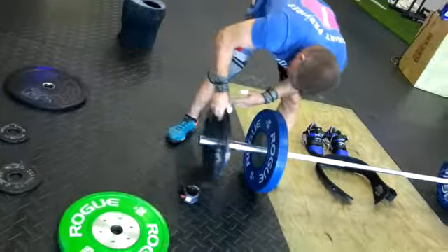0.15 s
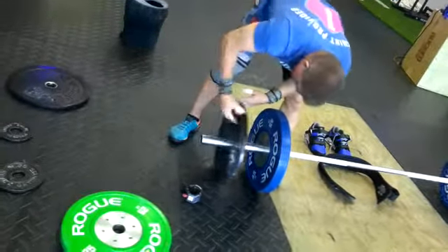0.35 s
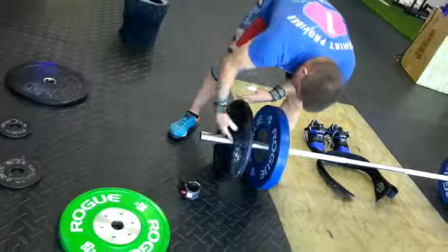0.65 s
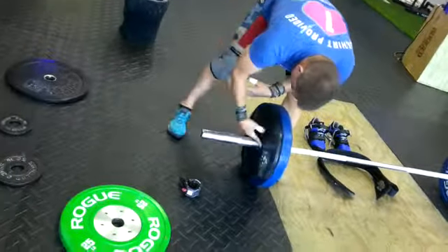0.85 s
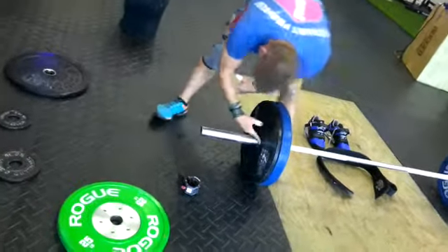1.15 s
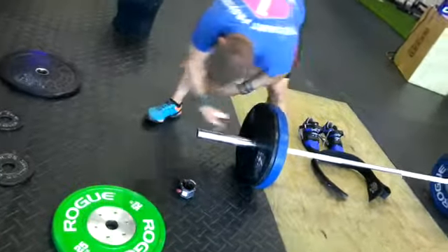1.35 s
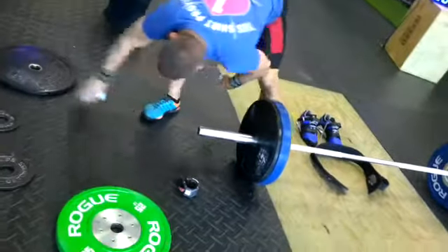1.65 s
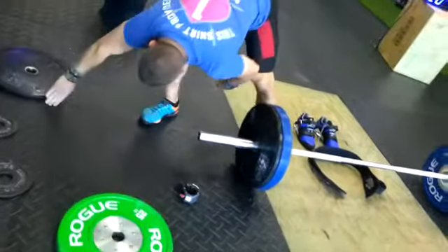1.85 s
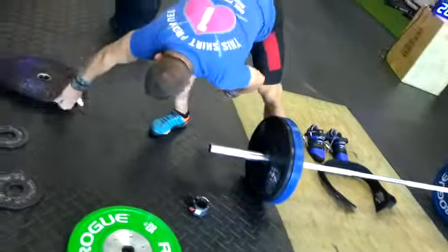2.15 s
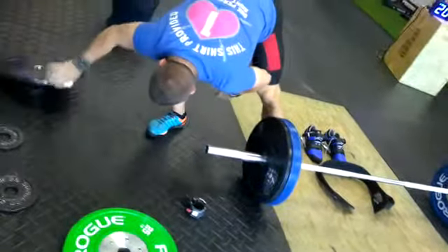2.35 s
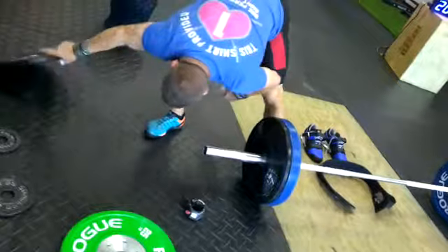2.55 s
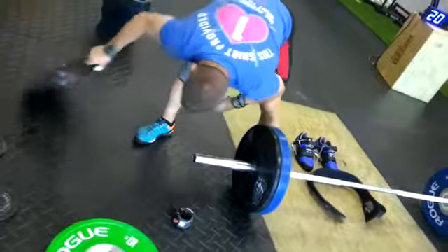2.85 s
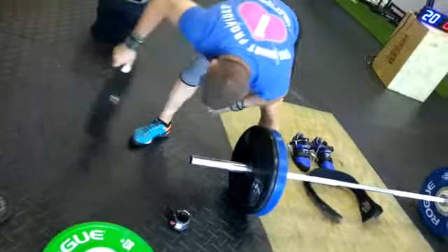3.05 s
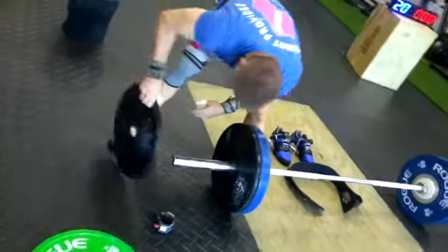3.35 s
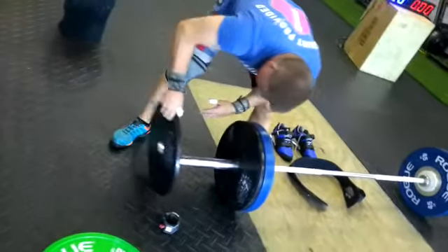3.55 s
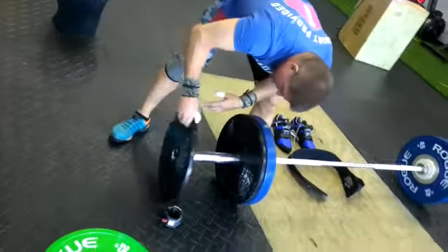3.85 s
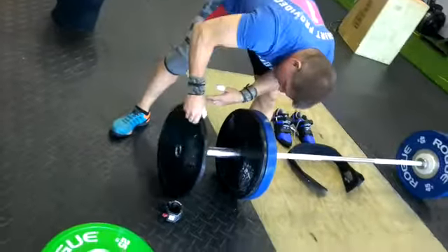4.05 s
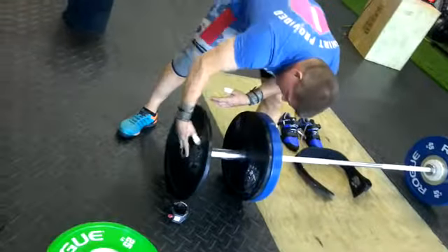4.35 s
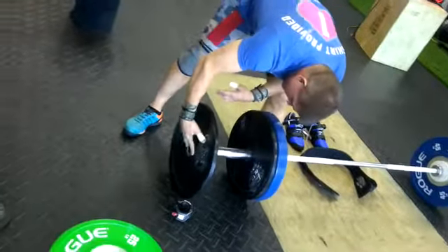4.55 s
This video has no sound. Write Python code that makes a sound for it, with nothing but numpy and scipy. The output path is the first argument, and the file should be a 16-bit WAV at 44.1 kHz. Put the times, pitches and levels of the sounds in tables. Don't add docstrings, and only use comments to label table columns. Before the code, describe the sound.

A rubber weight plate rattles onto a steel bar, squeals along and slams loudly against another plate, then a second plate is dragged and knocked on.

```python
import sys
import numpy as np
from scipy import signal
from scipy.io import wavfile
from scipy.ndimage import uniform_filter1d

SR = 44100
rng = np.random.default_rng(int(sys.argv[2]) if len(sys.argv) > 2 else 0)


def put_to_file(sound):
    columns = np.atleast_2d(sound).T
    safe = np.clip(columns, -1, 1)
    whole_steps = np.round(safe * 32767)
    wavfile.write(sys.argv[1], SR, whole_steps.astype(np.int16))


def gain_from_db(level_db):
    decades = np.asarray(level_db, float) / 20
    return 10 ** decades


N = 207415


def evened(x):
    return x / np.sqrt(np.mean(x ** 2) + 1e-20)


def read(points, hz):
    f, value = np.transpose(points)
    return np.interp(np.log(hz + 1), np.log(f + 1), value)


def add(mix, s, sound):
    part = mix[round(s * SR):][:len(sound)]
    part += sound[:len(part)]


def played(rows):
    s, *columns = np.transpose(rows)
    t = np.arange(s[0], s[-1], 1 / SR)
    return s[0], [np.interp(t, s, c) for c in columns]


def drift(count, span):
    once = uniform_filter1d(rng.standard_normal(count), int(span))
    return evened(uniform_filter1d(once, int(span)))


def resonate(x, hz, width_hz):
    turn = np.exp(2j * np.pi * np.cumsum(hz * np.ones(len(x))) / SR)
    r = np.exp(-np.pi * width_hz / SR)
    return 2 * (turn * signal.lfilter([1 - r], [1, -r], x / turn)).real


def ring(modes, uneven_db, rise_s, detune=0):
    t = np.arange(SR // 6) / SR
    hz, db, t60 = np.transpose(modes)[:, :, None]
    db = db + uneven_db * rng.standard_normal(db.shape)
    hz = hz * (1 + detune * rng.standard_normal(db.shape))
    decaying = gain_from_db(db - 60 * t / t60) * np.sin(2 * np.pi * hz * t)
    sound = decaying.sum(0) * (1 - np.exp(-t / rise_s))
    return sound / abs(sound).max()


def tick(t60, low_hz, top_hz):
    t = np.arange(2000) / SR
    band = signal.butter(2, [low_hz, top_hz], "bandpass", fs=SR)
    return signal.lfilter(*band, gain_from_db(-60 * t / t60) * rng.standard_normal(len(t)) / 2)


def gritty(count, spread_db):
    slips = evened(uniform_filter1d(rng.standard_normal(count), size=90))
    return evened(rng.standard_normal(count) * gain_from_db(spread_db * slips))


# [f/Hz, level/dB, t60/s]
SLAM_BLOWS = [
    (0.8548, 1, [(1053, 1.5, 0.029), (1371, -0.5, 0.031), (1532, -3.5, 0.023), (2046, -7.5, 0.031), (895, 1, 0.024)]),
    (0.8642, -6, [(1384, 1, 0.088), (1610, -2.5, 0.048), (2300, -7, 0.021), (2999, -7.5, 0.04), (1040, -3.5, 0.04)]),
    (0.8694, 11, [(323.4, 2, 0.068), (558, 5, .044), (630.4, 0.5, 0.051), (126.3, -17.5, 0.067), (50, -12, 0.069), (836.5, -9, .04), (1491, -6.5, 0.058)]),
]


def slam():
    out = np.zeros(N)
    for s, db, modes in SLAM_BLOWS:
        add(out, s, gain_from_db(db) * ring(modes, uneven_db=0, rise_s=0.0019))
        add(out, s, gain_from_db(db - 6) * tick(.025, low_hz=300, top_hz=3000))
        add(out, s + .0015, gain_from_db(db - 13) * tick(.014, low_hz=1800, top_hz=7500))
    return out


# steel ring/dB, sharpness/dB, hub crack/dB
KNOCKS = [(.005, -37, -8, 2, -4), (.021, -43, -5, -12, 2), (.032, -41, -5, 7, -2), (.039, -44, 1, -4, -3),
          (.055, -50, 1, 5, 2), (.079, -40, 2, 4, 2), (.090, -39.5, 3, 2.5, -6), (.159, -50, -5, 0, -6),
          (.187, -48, -2, -5, 10), (.197, -42, -8, 4, 8), (0.288, -58, 2, -2, 1), (.391, -50, -5, -7, -10),
          (3.682, -32, -12, -3, -6.5), (3.693, -30, -5, 0, 6), (3.895, -35, -18, 5, -0.5),
          (3.907, -31, -14, 2, -3), (3.928, -30, -22, 12, -5.5), (3.933, -26, -13, 6, -2.5),
          (3.954, -35.5, -9, 10, -0.5), (3.965, -32, -11, 2, -10), (4.156, -61.5, -4.5, 12, 0)]
# f/Hz, level/dB, t60/s
STEEL_LOW = [(3030, -3, .03), (3110, -2, .045), (2750, -8, .015), (3350, -12, .012), (5450, -7, .025),
             (5650, -9, .03)]
STEEL_HIGH = [(7270, -6, .025), (7600, -2, .035), (7800, -1, .03), (8030, -1, .04), (8270, -2, .03),
              (8700, -9, .015), (9300, -8, .02), (10780, -9, .022), (11900, -11, .02), (13390, -14, .03)]
HUB = [(1171, 3, 0.011), (1420, 3, 0.013), (1790, -2, .008), (2300, -2, .008)]
RUBBER = [(190.8, -4, 0.0621), (240, -2.5, 0.067), (279.1, -4, 0.082), (321, 1, 0.14), (380, -6, 0.026),
          (457, -5.5, 0.046), (650, -3, 0.055)]


def knocks():
    out = np.zeros(N)
    for touch_s, db, steel_db, sharp_db, crack_db in KNOCKS:
        s = touch_s + .001
        high_db = steel_db + sharp_db
        for modes, share_db in (STEEL_LOW, steel_db), (STEEL_HIGH, high_db), (HUB, crack_db):
            add(out, s, gain_from_db(db + share_db) * ring(modes, uneven_db=2.2, rise_s=0.0008, detune=0.0081))
        add(out, s, gain_from_db(db + high_db - 1.5) * tick(.02, low_hz=6000, top_hz=11960))
        add(out, s, gain_from_db(db + crack_db + 0.5) * tick(.025, low_hz=700, top_hz=3604))
        add(out, s, gain_from_db(db) * ring(RUBBER, uneven_db=3.5, rise_s=0.0015, detune=0.03955))
    return signal.lfilter(*signal.butter(2, 140, "highpass", fs=SR), out)


# t/s, length/s, start f/Hz, speed-up share per second/(1/s)
RIDGES = [(.315, .06, 950, 1.6), (.155, .024, 9135, .36), (.152, .028, 3600, .5), (.748, .044, 1830, 3),
          (.794, .018, 2560, 2.6), (.808, .056, 2890, 3.6), (.825, .016, 9450, .5)]
# level/dB, overtones against it/dB
SQUEALS = [(-56, -19), (-45, -60), (-59, -30), (-35, -29), (-44, -21), (-39.5, 3), (-34, -60)]


def squeal():
    out = np.zeros(N)
    attack, release, edge_db = .3, .25, 18
    for (top_db, over_db), (s, length, start_hz, speedup) in zip(SQUEALS, RIDGES):
        t = np.arange(0, length, 1 / SR)
        hz = start_hz * (1 + speedup * t)
        db = top_db - edge_db * np.interp(t / length, [0, attack, 1 - release, 1], [1, 0, 0, 1])
        wobble = evened(uniform_filter1d(rng.standard_normal((4, len(hz))), size=150, axis=1))
        turn = 2 * np.pi * np.cumsum(hz * (1 + 0.005 * wobble[0])) / SR
        over = 0
        for k, overtone_db in enumerate([-2, -15, -20], start=2):
            over = over + gain_from_db(overtone_db + 6.8 * wobble[k - 1]) * np.sin(k * turn)
        tone = np.sin(turn) + gain_from_db(over_db) * over
        add(out, s, gain_from_db(db + 4.5) * tone * signal.windows.tukey(len(hz), .1))
    return out


# t/s, hiss level/dB
RUBS = [
    [(0, -58), (.07, -60), (.085, -50.5), (.2, -54), (.28, -61), (.4, -60), (.48, -74)],
    [(.68, -75), (.74, -53), (.785, -44), (.81, -35), (.84, -32), (.858, -35)],
    [(3.928, -51), (3.95, -49), (3.99, -63), (4.12, -78)],
]
# hub body level/dB, disc hum level/dB
GRIP = [(1, 1.5), (1.5, -18), (1.5, -4)]
# f/Hz, width/Hz, level/dB
RUB_BANDS = [(3100, 500, -8), (5750, 400, -5), (6495, 1014, -1), (7646, 1000, 1), (9320, 870, 0),
             (10940, 1400, -1.5), (13000, 1600, -11), (4300, 2200, -2), (8790, 3000, 1.5)]


def slide():
    out = np.zeros(N)
    medium_db, lag_share = -55, .35
    for rows, (grip_db, hum_db) in zip(RUBS, GRIP):
        s, (db,) = played(rows)
        body_db = grip_db + lag_share * (medium_db - db)
        grit = gritty(len(db), spread_db=1.5)
        hiss = 0
        for hz, width_hz, gain_db in RUB_BANDS:
            place = hz * (1 + .025 * drift(len(db), span=900))
            band = resonate(resonate(grit, place, width_hz), place, width_hz) / np.sqrt(width_hz)
            hiss = hiss + gain_from_db(gain_db + 3.0 * drift(len(db), span=237)) * band
        body = evened(resonate(resonate(grit, 1100, 1100), 1400, 1100))
        hum = evened(resonate(resonate(grit, 314, 60), 314, 90))
        rub = evened(hiss) + gain_from_db(body_db) * body + gain_from_db(hum_db) * hum
        add(out, s, gain_from_db(db) * rub * signal.windows.tukey(len(db), .04))
    return out


# t/s, blow level/dB, f/Hz
BUMPS = [(1.441, -50, 140), (1.53, -47, 144), (1.635, -45, 145), (1.988, -51.5, 546), (2.14, -49.5, 140),
         (2.741, -51, 555), (2.805, -47, 600), (2.842, -47.5, 650), (2.866, -43.5, 600), (2.887, -44, 750),
         (2.933, -37, 600), (2.95, -32, 540), (2.967, -47, 600), (2.986, -31, 590), (3.022, -53, 545),
         (3.161, -42.5, 900), (3.178, -59, 1600), (3.629, -49, 109.3), (3.91, -36, 315),
         (3.936, -29.5, 321), (4.142, -54, 321), (4.395, -47, 308), (4.41, -48, 300), (4.611, -58.5, 380)]
# f/Hz, tick level/dB
TICK = [(320, -44), (550, -26), (900, 8), (1600, -8)]


def bumps():
    out = np.zeros(N)
    for s, db, hz in BUMPS:
        t60 = 18 / hz
        modes = [(hz, 0, t60), (0.733 * hz, -5, t60), (1.52 * hz, -7, t60)]
        add(out, s, gain_from_db(db) * ring(modes, uneven_db=1.5, rise_s=0.00053))
        add(out, s, gain_from_db(db + read(TICK, hz)) * tick(0.012, low_hz=1200, top_hz=9500))
    return out


# start t/s, rise/s, fall/s, level/dB,
# centre f/Hz
SCUFFS = [(2.03, .12, .1, -63.5, 950), (2.18, .03, .09, -59, 4300), (2.2, 0.049, .16, -55.5, 2200),
          (2.71, .038, .04, -59, 600), (2.74, 0.15, .05, -51.5, 600), (2.9, 0.053, .14, -53, 600),
          (3.1, .012, .035, -62, 4400), (3.163, .012, .06, -55.5, 2100), (3.48, .15, .04, -63.5, 200),
          (3.655, .015, .012, -46, 195), (3.93, .01, .17, -47, 4600), (3.925, .01, .11, -44, 780),
          (.71, .04, .07, -52, 530), (.18, .018, .03, -42.5, 1500)]


def scuffs():
    out = np.zeros(N)
    for start, rise_s, fall_s, top_db, hz in SCUFFS:
        soft_db = top_db - 20.5
        peak_s = start + rise_s
        s, (db,) = played([(start, soft_db), (peak_s, top_db), (peak_s + fall_s, soft_db)])
        band = resonate(resonate(gritty(len(db), spread_db=2.9), hz, 1.5 * hz), hz, 2.0 * hz)
        add(out, s, gain_from_db(db) * evened(band) * signal.windows.tukey(len(db), .15))
    return out


# f/Hz, t60/s
HALL_T60 = [(60, 0.12), (150, .9), (300, .8), (600, 0.78), (1500, 0.84), (3000, 0.86), (6000, 0.78),
            (10000, .68), (16000, 0.63)]
# f/Hz, build-up time/s
BUILD = [(300, 0.01), (1500, 0.032), (4000, 0.04), (12000, 0.22)]


def hall(x, colour, far):
    hz, t, z = signal.stft(rng.standard_normal(3 * SR // 2), SR, nperseg=512)
    z = z * gain_from_db(read(colour, hz)[:, None] - 60 * t / read(HALL_T60, hz)[:, None])
    z = z * (1 - np.exp(-t / (far * read(BUILD, hz)[:, None])))
    tail = signal.istft(z, SR, nperseg=512)[1]
    tail = tail * np.clip((np.arange(len(tail)) / SR - .008) / 0.005, 0, 1)
    return signal.fftconvolve(x, tail / np.linalg.norm(tail))[:N]


# f/Hz, level/dB per Hz
AIR = [(12, -25), (20, -6), (76, -8), (116, -10), (149, -5), (197, -22), (226, -7), (291, -11.5),
       (325, -16), (537, -14), (710, -17.5), (1430, -16), (1690, -22.5), (13700, -29.5), (15700, -30)]


def air():
    frames, hz = N // 256 + 5, np.fft.rfftfreq(1024, 1 / SR)
    a, b, patches = rng.standard_normal((frames, 513, 3)).T
    patches = uniform_filter1d(patches, size=6, axis=0)
    patches = evened(uniform_filter1d(patches, size=14, axis=1))
    patchy_db = read([(60, 1.2), (400, 4), (2000, 0.46), (16000, .4)], hz)[:, None]
    z = (a + 1j * b) * gain_from_db(read(AIR, hz)[:, None] + patchy_db * patches)
    return gain_from_db(-60) * evened(signal.istft(z, nperseg=1024, noverlap=768)[1][:N])


# f/Hz, level/dB
HALL_COLOUR = [(40, -16), (120, -2.5), (300, 2.5), (600, 0.5), (1200, -4.5), (3000, 1.5), (8000, 3.5),
               (16000, -3)]
# f/Hz, level/dB per Hz
BOOM = [(60, -62), (130, -47), (180, -9), (260, -12.5), (335, -4), (450, -12.5), (590, 2), (870, -16),
        (1480, -13.5), (2300, -23), (3000, -22), (4600, -25.5), (8300, -32), (15500, -47)]


def scene():
    near = knocks() + bumps() + slide() + squeal() + scuffs()
    shocks = np.zeros(N)
    for s, db, modes in SLAM_BLOWS:
        add(shocks, s, gain_from_db(db + 15) * np.ones(1))
    no_bass = signal.butter(4, 145, "highpass", fs=SR, output="sos")
    boom = signal.sosfilt(no_bass, hall(shocks, BOOM, far=1))
    tail = hall(gain_from_db(-10) * near, HALL_COLOUR, far=.25)
    return (near + slam() + tail + boom + air())[None]


def roll_off(x):
    return signal.sosfilt(signal.butter(12, 15850, fs=SR, output="sos"), x)


def record(dry):
    power_db = 10 * np.log10(abs(uniform_filter1d(dry[0] ** 2, size=300)) + 1e-12)
    fall = np.arange(N) * 52.0 / SR
    held_db = np.maximum.accumulate(power_db + fall) - fall
    over_db = np.maximum(held_db + 6.0, 0)
    lag = np.exp(-1 / (0.028 * SR))
    ducked = dry / gain_from_db(0.71 * signal.lfilter([1 - lag], [1, -lag], over_db))
    clipped = np.clip(ducked, -.71, .71)
    edge = signal.firwin(255, 15800, window=("kaiser", 9), fs=SR)
    return roll_off(signal.oaconvolve(clipped, edge[None], "same"))


dry = scene()
out = record(dry)
put_to_file(out)
```